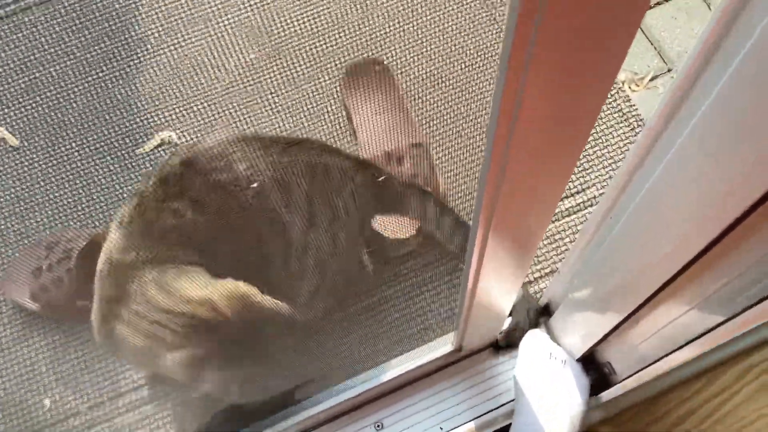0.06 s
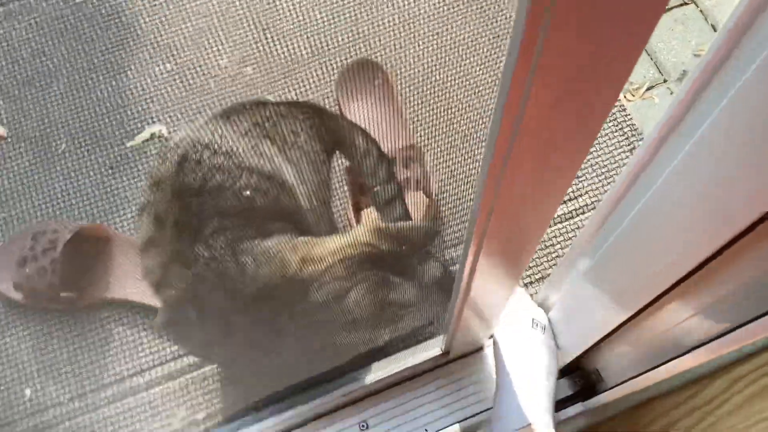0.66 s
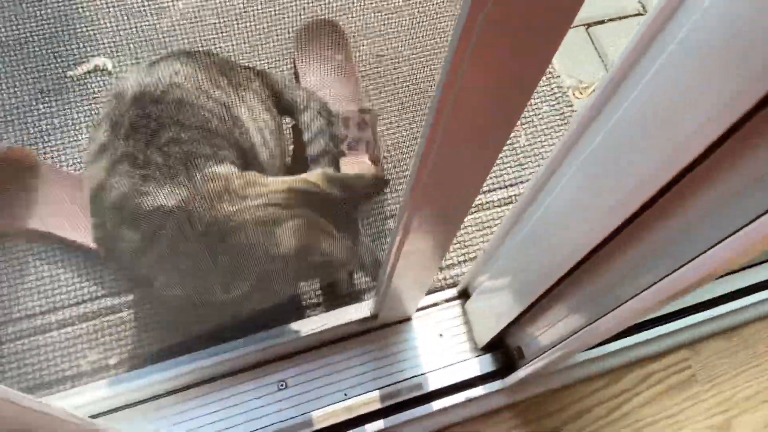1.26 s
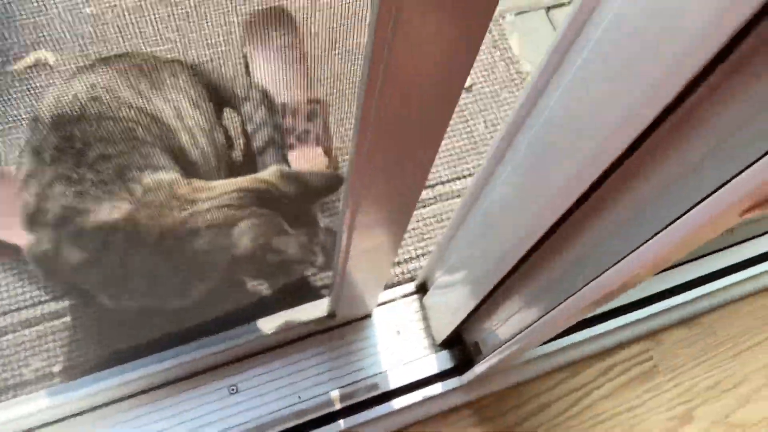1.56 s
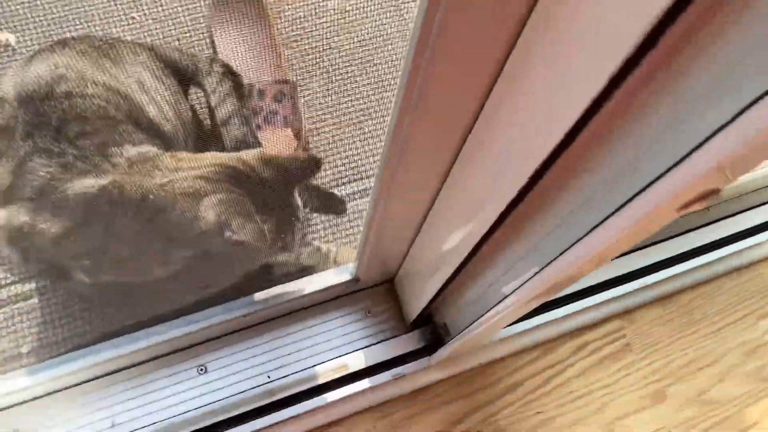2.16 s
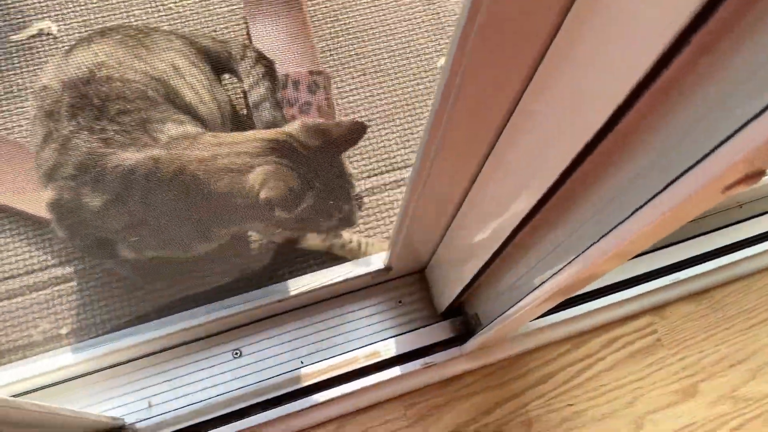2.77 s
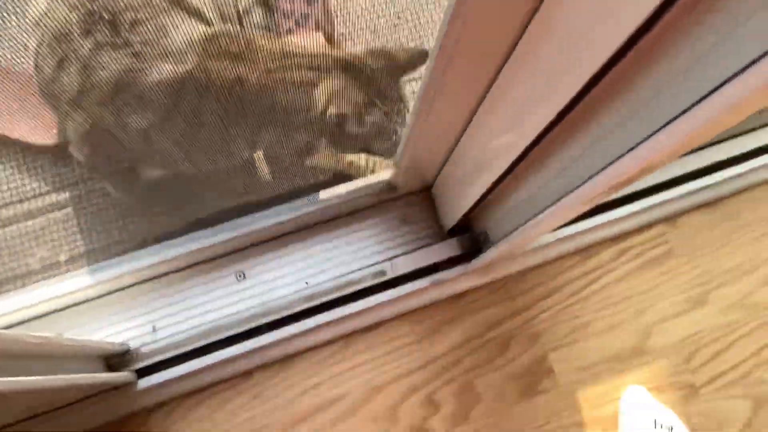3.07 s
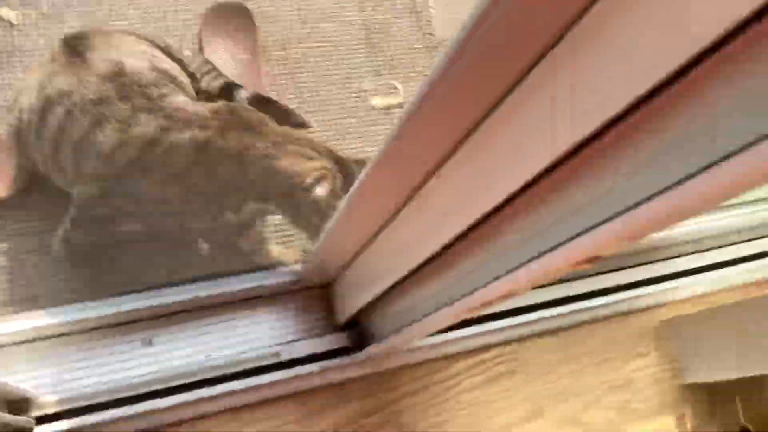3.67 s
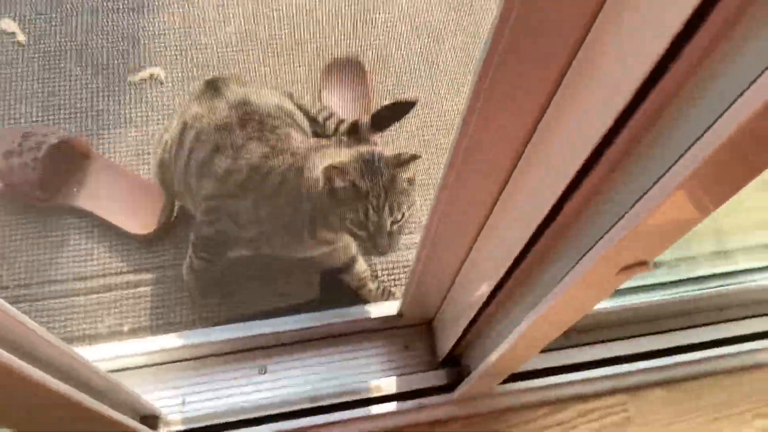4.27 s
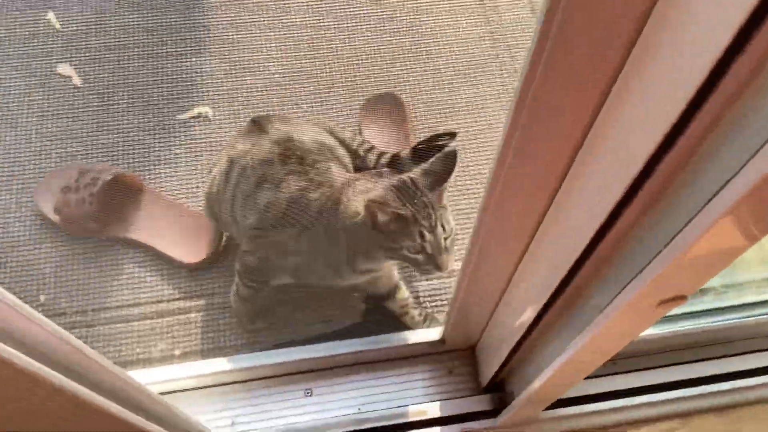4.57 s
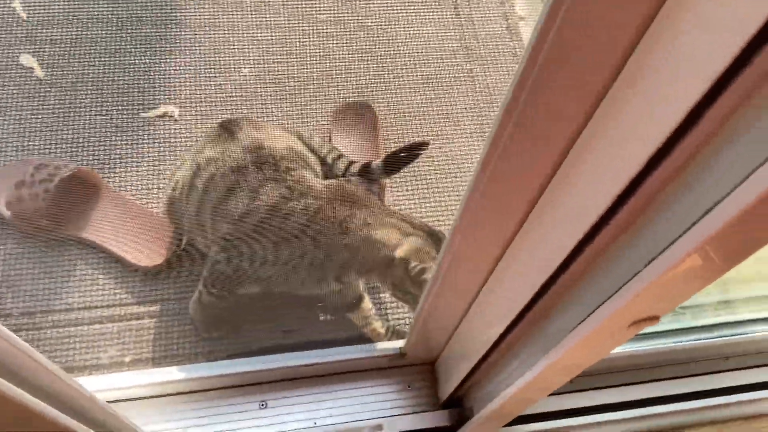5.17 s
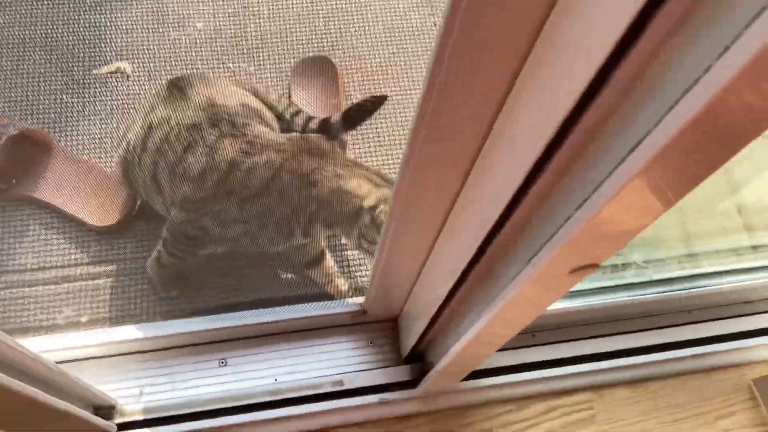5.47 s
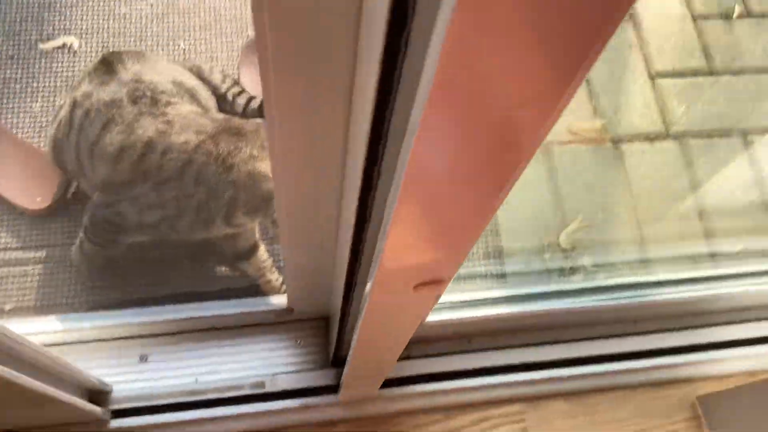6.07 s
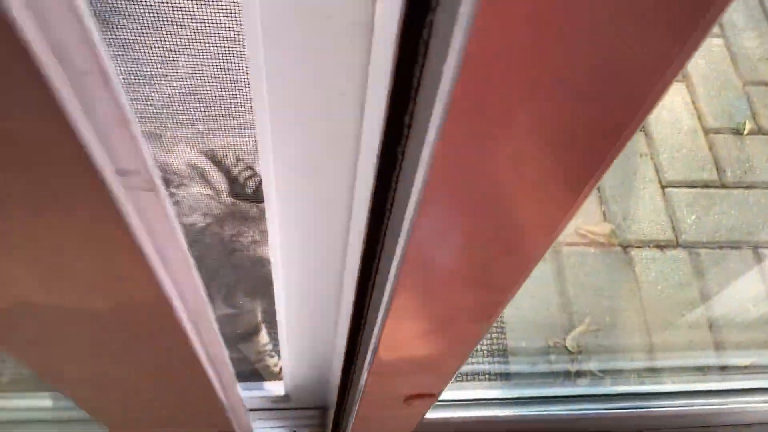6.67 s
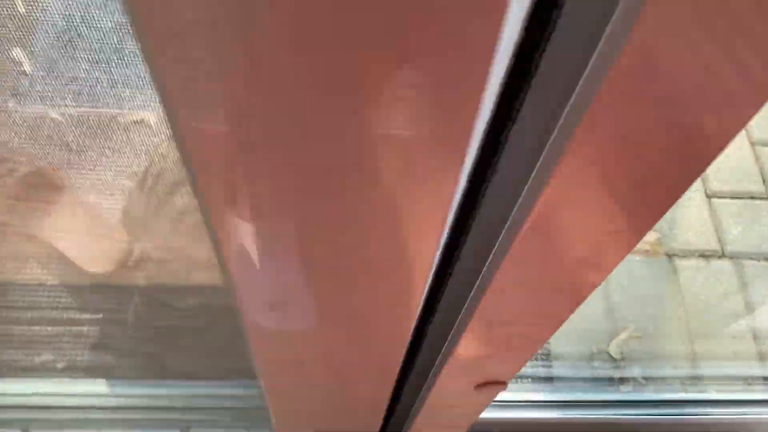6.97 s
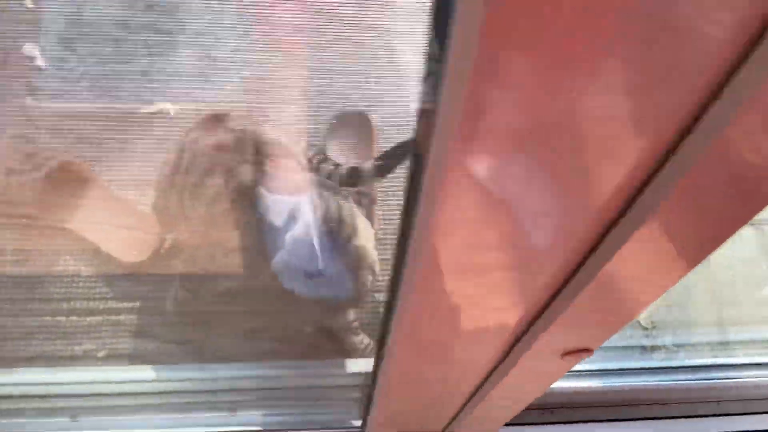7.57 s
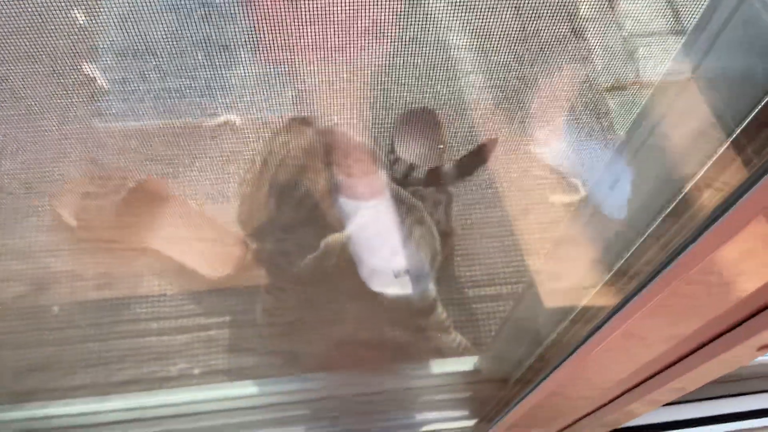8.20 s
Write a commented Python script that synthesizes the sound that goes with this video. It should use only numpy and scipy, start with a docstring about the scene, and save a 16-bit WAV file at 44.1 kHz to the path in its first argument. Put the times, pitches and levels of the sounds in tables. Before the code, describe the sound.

A sliding patio door knocks and rattles under someone's hand, then rolls softly along its track and shuts with a ringing thud.

```python
"""Two bangs of a sliding patio door in its frame, then close knocks, rattles and scuffs of handling and
door. The leaf rolls along its track with a soft brushing hiss and shuts with a ringing thud; the
latch clicks. Soft footfalls and rustling go on in between. Knocks are chattering impulses through
resonant bands, rubbing and rolling are grainy noise, and the leaf, its metal frame and a loose fitting
ring in decaying modes."""
import sys
import numpy as np
from scipy import signal
from scipy.fft import rfft, irfft, next_fast_len
from scipy.io import wavfile
from scipy.ndimage import map_coordinates

SR = 44100
rng = np.random.default_rng(int(sys.argv[2]) if len(sys.argv) > 2 else 0)


def bounce(signal):
    """Save signal as a 16-bit WAV file at the path given by the first command-line argument."""
    frames = np.transpose(np.atleast_2d(signal))
    limited = np.clip(frames, -1, 1)
    pcm = np.round(limited * 32767).astype(np.int16)
    wavfile.write(sys.argv[1], SR, pcm)


N = 372204
ROLL_START_S, SHUT_S = 5.72, 7.15
KNOCK_TOP_HZ = 10660  # upper edge of a knock's bright tick

# close knocks of handling and door: t/s, clack/dB, clack/Hz, thud/dB, thud/Hz, crack/dB, chatter/ms
KNOCKS = [(0.9042, -40.5, 1140, -50, 330, -53, 13), (0.9533, -37, 1190, -32, 228, -59, 4.1),
          (1.042, -23, 1430, -43, 168, -48, 11), (1.0765, -25.5, 1800, -42, 403, -44, 1.6),
          (1.3503, -48, 1920, -53, 415, -30, 6.5), (1.481, -43, 1410, -51, 214, -41, 9.6),
          (1.539, -59, 850, -40, 507, -56, 4.3), (1.6968, -45, 950, -49, 250, -81, 4.7),
          (1.9453, -13.5, 1580, -36, 212, -25, 0.8), (1.9769, -39, 1950, -54, 160, -29, 1.7),
          (1.9815, -23, 1710, -30, 256, -23, 2.2), (3.2297, -34.5, 1500, -31, 302, -41, 4),
          (3.2405, -27.5, 1600, -18, 316, -42, 4), (3.246, -22, 1840, -14.5, 258, -31, 1.8),
          (3.268, -33, 1520, -27, 383, -44, 5.5), (3.434, -42, 1330, -37, 380, -47.5, 12),
          (3.51, -29.5, 1530, -25, 229, -38, 2), (3.5445, -35, 1760, -44, 231, -26.5, 1.9),
          (3.5548, -26, 1920, -46, 340, -29, 1.2), (3.5882, -15, 2000, -29, 219, -25, 1.3),
          (3.612, -35, 1150, -31.5, 374, -31, 6), (3.648, -50, 1950, -33.5, 340, -29.5, 3.1),
          (3.7752, -31, 2250, -25, 694, -25.5, 2.5), (3.7825, -32, 2100, -36.5, 600, -29, 2.5),
          (3.8064, -21, 1810, -32, 500, -23.5, 1.4), (3.814, -25, 1830, -46, 525, -27.5, 0.6),
          (3.839, -45, 1900, -30, 154, -41, 1.6), (3.8486, -35, 2120, -32.5, 345, -37.5, 1.2),
          (3.885, -39.5, 1446, -52, 460, -54, 0.35), (3.923, -40, 2030, -33, 433, -32, 4.8),
          (3.9799, -54, 1950, -39, 523, -42, 1.1), (3.9896, -46, 1950, -37.5, 454, -45, 3.8),
          (4.2, -44.5, 1710, -51, 370, -50.5, 3.7), (4.247, -42, 1540, -53, 402, -46, 1.4),
          (4.4001, -27.5, 1620, -31.5, 310, -45, 1.3), (4.6897, -41.5, 1850, -45.5, 333, -44.5, 0.47),
          (4.7228, -34, 1700, -28.5, 330, -46, 3), (4.7382, -33, 1600, -31.5, 370, -48, 2.3),
          (4.743, -25.5, 1540, -27.5, 353, -38.5, 0.47), (5.872, -49.5, 1760, -57.5, 561, -56, 1.9),
          (6.049, -51, 1900, -61, 503, -56, 3.1), (6.449, -44, 1870, -64, 500, -55, 2.9),
          (6.755, -48, 1390, -47.5, 570, -56, 4.4), (7.1503, -34.5, 1460, -31.5, 630, -32.5, 1.2),
          (7.9812, -46.5, 2110, -41, 360, -63, 9), (8.052, -46, 1750, -46, 368, -61, 1.5),
          (8.104, -57.5, 1890, -55, 454, -60, 2.4), (8.1155, -41, 1780, -44.5, 378, -58, 0.61)]
# modes of the leaf and its metal frame: f/Hz, level/dB, t60/s
DOOR_MODES = [(77, -16.5, 0.3), (115, -15, .32), (149, -16, .32), (234, -10.5, .32), (330, -16, 0.69),
              (509, 2, 0.22), (620, -8.5, 0.09), (830, 4.5, 0.1), (891, 19, 0.031), (3570, -17.5, .36),
              (4900, -12.5, .2), (5130, -8, 0.12), (5580, -19, 0.44), (5830, -15.5, .3), (7500, -11, .33),
              (8166, -19, .28), (8823, -10, .2), (9300, -12.5, 0.29), (9749, -12.5, 0.45),
              (10200, -14, .28), (11100, -20, .36), (11400, -19, .26)]
# EQ curve of the shuddering door: f/Hz, level/dB
SHUDDER_EQ = [(24, -39.5), (40, -7), (145, 0), (177, -12.5), (222, -7), (550, -17), (2140, -19),
              (2830, -29.5), (3550, -20.5), (4560, -23.5), (5310, -19), (6830, -26.5), (9970, -20.5),
              (15300, -37.5), (16500, -46.5)]
# the four registers low, mid, high, top: from/Hz, to/Hz
BANDS = [(45, 650), (650, 2700), (2700, 7000), (7000, 15000)]


def from_db(db):
    """Decibels to gain."""
    return 10 ** (np.asarray(db) / 20)


def rms_one(x):
    """Scale to rms 1."""
    return x / np.sqrt(np.mean(x ** 2) + 1e-20)


def add(out, s, sound):
    """Mix a sound in at time s."""
    at = max(round(s * SR), 0)
    out[at:at + len(sound)] += sound[:max(N - at, 0)]


def gate(start_s, end_s, ramp_s=0.012):
    """1 during a spell, with short ramps at both ends."""
    t = np.arange(N) / SR
    return np.clip(np.minimum(t - start_s, end_s - t) / ramp_s + .5, 0, 1)


def drift(turns_per_s):
    """A random control curve of rms 1."""
    turns = rng.standard_normal(N // 16)
    return rms_one(np.interp(np.arange(N) / SR * turns_per_s, np.arange(len(turns)), turns))


def grainy_noise(grain_db, grains_per_s):
    """White noise roughened by a fast flicker in level."""
    return rng.standard_normal(N) * from_db(grain_db * drift(grains_per_s))


def band(x, low_hz, high_hz, order=2):
    """Butterworth band-pass."""
    sos = signal.butter(order, [low_hz, min(high_hz, .45 * SR)], "band", fs=SR, output="sos")
    return signal.sosfilt(sos, x + 1e-18)


def resonate(x, hz, width_hz, db):
    """Boost or cut one resonant band."""
    r = np.exp(-np.pi * width_hz / SR)
    poles = [1, -2 * r * np.cos(2 * np.pi * hz / SR), r * r]
    peak = signal.lfilter(np.array([1, 0, -1]) * (1 - r * r) / 2, poles, x)
    return x + (from_db(db) - 1) * peak


def resonances(x, table):
    """A chain of resonant boosts and cuts."""
    for hz, width_hz, db in table:
        x = resonate(x, hz, width_hz, db)
    return x


def registers(source, eq):
    """EQ a source and split it into the four registers, each of rms 1."""
    hz, db = np.transpose(eq)
    size = next_fast_len(N, real=True)
    gain = from_db(np.interp(np.log(np.fft.rfftfreq(size, 1 / SR) + 1), np.log(hz), db))
    coloured = irfft(rfft(source, size) * gain)[:N]
    return np.array([rms_one(band(coloured, low, high, order=4)) for low, high in BANDS])


def contact_colour(x):
    """The resonances shared by struck and rubbed parts."""
    # peaks and dips: f/Hz, width/Hz, gain/dB
    peaks = [(2100, 31, 0.5), (2780, 430, -2), (5720, 1300, 4.5), (10200, 990, -1.5)]
    return resonances(x, peaks)


def metal_tone(x, width_hz, lift_db):
    """Rubbing and chatter keep the high modes of the metal frame sounding."""
    return resonances(x, [(hz, width_hz, lift_db) for hz, _, _ in DOOR_MODES if hz > BANDS[2][0]])


def cupped_colour(x, spell_s=(3.6, 4.72)):
    """Hollow, cupped resonances colour the close handling sounds for a spell."""
    # peaks and dips: f/Hz, width/Hz, gain/dB
    peaks = [(90, 89, -7), (926, 46, 2.5), (1070, 280, 4), (1450, 140, -4), (1660, 100, 2), (2550, 140, 1),
             (2860, 88, 6), (3250, 350, -2.5), (3870, 83, 1), (5100, 120, 2.5), (7800, 900, -5.5),
             (14000, 7600, -7)]
    inside = x * gate(*spell_s) + 1e-18
    return x - inside + resonances(inside, peaks)


def bass_lag(x, corner_hz=110, stages=9):
    """All-pass stages hold the bass behind the treble, so every knock sweeps down in pitch."""
    r = np.exp(-2 * np.pi * corner_hz / SR)
    return signal.sosfilt(np.tile([-r, 1, 0, 1, -r, 0], (stages, 1)), x + 1e-18)


def reflections(x, t60=0.16, level_db=-20, predelay_s=0.003):
    """Faint early reflections off glass, frame and floor."""
    t = np.arange(SR // 2) / SR
    echoes = band(rng.standard_normal(len(t)), 500, 7000, order=1)
    echoes = echoes * from_db(-60 * t / t60) * (t > predelay_s)
    return from_db(level_db) * signal.fftconvolve(x, echoes / np.linalg.norm(echoes))[:N]


def near_surfaces(x, wander_ms=0.28, turns_per_s=4):
    """The microphone sways near hard surfaces, whose echoes make a shifting comb filter."""
    # paths by way of glass and frame: delay/ms, gain
    paths = [(1.3, 0.24), (2.9, 0.24), (4.7, 0.18)]
    out = x
    for delay_ms, gain in paths:
        lag = (delay_ms + wander_ms * drift(turns_per_s)) * SR / 1000
        out = out + gain * map_coordinates(x, [np.arange(N) - lag], order=3)
    return out / np.sqrt(1 + sum(gain ** 2 for _, gain in paths))


def effort(rest_db=-67):
    """Strength of the handling, zero at rest."""
    # rubbing of the handling: t/s, level/dB
    handling = [(0.0, -63.5), (0.87, -56), (1.04, -42), (1.18, -55), (1.72, -53), (2.01, -47.5), (2.2, -57),
                (2.6, -82.5), (3.27, -51.5), (3.42, -45), (3.55, -41.5), (3.7, -48.5), (3.79, -48),
                (3.96, -47.5), (4.24, -49), (4.59, -58), (4.83, -60.5), (5.6, -72.5)]
    level_db = np.interp(np.arange(N) / SR, *np.transpose(handling))
    return np.maximum(from_db(level_db) - from_db(rest_db), 0)


def air_and_motion(fastest_s=6.35, hush_s=0.6, waver_db=0.44):
    """The bed: outdoor air that the shut door muffles, rubbing hands, roller rumble, brush-seal hiss."""
    # EQ curve of the bed: f/Hz, level/dB
    bed_eq = [(21, -53), (35, -21.5), (76, 12), (121, 8.5), (275, 6.5), (551, -4), (611, -15), (790, -13.5),
              (1320, -13), (1580, -15), (2790, -26.5), (6360, -22.5), (10400, 3), (15300, -13),
              (16500, -46)]
    # its mix by register: air/dB, change once shut/dB, handling/dB, rolling/dB, exponent of speed
    mix = [(-64, 3, -3.5, -55, 0.97), (-67.5, -11, -6, -56, 0.99), (-75.5, -1, -9, -56, 0.59),
           (-71.5, -3.5, -14.5, -52, 0.67)]
    # resonances of the track: f/Hz, width/Hz, gain/dB
    track = [(273, 750, 5.5), (446, 40, 1.5), (630, 40, 5), (1150, 81, 4), (1270, 51, 0.5), (2620, 600, -3),
             (3900, 1100, 4)]
    t = np.arange(N) / SR
    speed = np.interp(t, [ROLL_START_S, fastest_s, SHUT_S], [0.32, 1, 0.41])  # share of top speed
    rolls, handled = gate(ROLL_START_S, SHUT_S), effort()
    shut = np.clip((t - SHUT_S) / hush_s, 0, 1)
    grains = registers(grainy_noise(grain_db=1.5, grains_per_s=500), bed_eq)
    still = rolling = 0
    for noise, (air_db, shut_db, handling_db, roll_db, power) in zip(grains, mix):
        noise = noise * from_db(waver_db * drift(35))
        air, hands = from_db(air_db + shut_db * shut), from_db(handling_db) * handled
        still = still + noise * (1 - rolls) * np.hypot(air, hands)
        rolling = rolling + noise * rolls * from_db(roll_db) * speed ** power
    return still + resonances(rolling, track)


def grit(per_s=24, level_db=-29, spread_db=4):
    """Specks in the track tick dully under the rollers."""
    specks = (rng.random(N) < per_s / SR) * gate(ROLL_START_S, SHUT_S)
    sizes = from_db(level_db + spread_db * np.clip(rng.standard_normal(N), -2, 2))
    return contact_colour(band(specks * sizes, 400, 2800))


def loose_parts(per_s=22, over_effort_db=24, spread_db=3):
    """Loose fittings tick at random, louder with stronger handling."""
    sizes = from_db(over_effort_db + spread_db * np.clip(rng.standard_normal(N), -2, 2)) * effort()
    ticks = rng.random(N) < per_s / SR
    return contact_colour(band(sizes * ticks, 300, 5000))


def wobbles(length_s=0.0339, sag=0.24):
    """Rollers and swaying leaf give round, dull bumps: a few cycles of sine that sag in pitch."""
    # bumps: crest/s, level/dB, f/Hz
    bumps = [(4.236, -43.5, 243), (4.359, -47, 250.5), (5.918, -44.5, 265), (6.061, -43, 278),
             (6.196, -43, 234), (6.225, -44.5, 278), (6.25, -46.5, 290), (6.837, -52, 302),
             (7.606, -44.5, 293)]
    out, along = np.zeros(N), np.linspace(-.5, .5, int(length_s * SR))
    swell = np.sqrt(2) * np.cos(np.pi * along) ** 2
    for crest, db, hz in bumps:
        phase = 2 * np.pi * (np.cumsum(hz * (1 - sag * along)) / SR + rng.random())
        add(out, crest - length_s / 2, from_db(db) * swell * np.sin(phase))
    return out


def muffled_rubs(curve=0.48, band_hz=(720, 1900)):
    """Soft shuffling with no treble swells and trails off."""
    # shuffles: start/s, crest/s, end/s, level/dB
    rubs = [(3.6, 3.607, 3.73, -39), (3.665, 3.736, 3.79, -47), (7.56, 7.615, 7.79, -57.5),
            (7.946, 7.97, 7.8, -52)]
    grains = grainy_noise(grain_db=3, grains_per_s=160)
    t = np.arange(N) / SR
    level = sum(from_db(db) * np.interp(t, times, [0, 1, 0]) ** curve for *times, db in rubs)
    return level * rms_one(band(grains, *band_hz, order=8))


def friction(eq, grain_db, grains_per_s, lowest_hz):
    """Dense catches and slips with a metallic tinge, in four registers."""
    grains = metal_tone(contact_colour(grainy_noise(grain_db, grains_per_s)), width_hz=48, lift_db=4)
    return registers(band(grains, lowest_hz, SR / 2), eq)


def rustles(release_s=0.077, fade_db=7.5, uneven_db=3, hiss_share=0.34, ring_q=14, ring_db=9):
    """Soft strokes of hand and cloth fade unevenly and lift off; the rubbed part rings."""
    # strokes: start/s, end/s, attack/ms, rub/dB, hiss/dB, ring/Hz
    strokes = [(0.102, 0.36, 38, -66, -68, 3800), (0.327, 0.556, 230, -54, -50, 7500),
               (0.562, 0.818, 15, -73, -59.5, 10600), (1.099, 1.254, 34, -49, -50, 1910),
               (1.297, 1.47, 23, -53.5, -53, 5300), (1.399, 1.629, 71, -48, -50, 760),
               (1.696, 2.032, 83, -52, -47, 5400), (2.296, 2.567, 140, -59, -55.5, 1770),
               (2.885, 2.998, 12, -56.5, -55.5, 2040), (3.088, 3.26, 240, -72.5, -54.5, 10100),
               (3.32, 3.526, 140, -45, -51, 5400), (4.064, 4.212, 25, -49, -55, 5100),
               (4.471, 4.635, 15, -56, -56.5, 2850), (4.589, 4.724, 6.1, -47, -45.5, 5000),
               (4.852, 5.145, 61, -94, -69.5, 10900), (6.961, 7.15, 88, -66, -49, 10000),
               (7.419, 7.616, 12, -64, -55, 10600), (7.552, 7.71, 43, -60, -75, 315),
               (7.949, 8.142, 7.5, -58.5, -59.5, 2020), (8.11, 8.393, 16, -67.5, -66.5, 5180),
               (8.32, 8.484, 45, -54.5, -57.5, 3100)]
    # EQ curve of light rubbing: f/Hz, level/dB
    rustle_eq = [(29, -43), (90, -6.5), (330, -6.5), (640, -15), (900, -7), (1300, -6), (2100, -8.5),
                 (3200, -12.5), (4300, -8.5), (5400, -13), (6900, -15), (10200, -6.5), (12000, -12.5),
                 (15000, -24), (16500, -51)]
    out = np.zeros(N)
    grains = friction(rustle_eq, grain_db=2, grains_per_s=870, lowest_hz=120)
    grains *= from_db(uneven_db * drift(45))
    for s, end_s, attack_ms, rub, hiss, hz in strokes:
        piece, length = grains[:, int(s * SR):int(end_s * SR)], end_s - s
        t = np.arange(piece.shape[1]) / SR
        ramps = np.clip(np.minimum(t * 1000 / attack_ms, (length - t) / release_s), 0, 1)
        envelope = ramps * from_db(-fade_db * t / length)
        gains = from_db([rub - 5, rub, rub + hiss_share * (hiss - rub) - 4, hiss])  # low to top
        add(out, s, resonate(envelope * (gains @ piece), hz, hz / ring_q, ring_db))
    return out


def swishes(taper=0.79, rough_db=1.5, catches_per_s=220):
    """Fine, uneven friction sings or rasps in a narrow band that glides along the stroke."""
    # strokes: start/s, end/s, from/Hz, to/Hz, width/Hz, level/dB
    strokes = [(1.013, 1.077, 3500, 3400, 100, -45), (1.056, 1.083, 6500, 11400, 340, -24),
               (3.61, 3.68, 800, 760, 46, -32.5), (3.607, 3.635, 3900, 4770, 1000, -26.5),
               (3.628, 3.678, 2600, 2520, 240, -35), (3.713, 3.77, 660, 690, 70, -43.5),
               (4.31, 4.484, 7160, 6330, 260, -58), (4.366, 4.48, 5700, 5450, 320, -57),
               (4.585, 4.673, 2970, 2880, 70, -48.5), (4.724, 4.767, 2650, 2600, 180, -41),
               (5.753, 5.805, 9300, 11500, 260, -51), (7.581, 7.78, 2435, 2420, 9.8, -70),
               (7.574, 7.678, 315, 325, 14, -52.5), (7.581, 7.715, 940, 920, 25, -61.5)]
    out = np.zeros(N)
    white = rng.standard_normal(N) + 1j * rng.standard_normal(N)
    catches = from_db(rough_db * drift(catches_per_s))
    for s, end_s, from_hz, to_hz, width_hz, db in strokes:
        grains = signal.sosfilt(signal.butter(2, width_hz, fs=SR, output="sos"), white) * catches
        piece = grains[int(s * SR):int(end_s * SR)]
        along = np.linspace(0, 1, len(piece))
        phase = 2 * np.pi * np.cumsum(from_hz + (to_hz - from_hz) * along) / SR
        singing = rms_one(np.real(piece * np.exp(1j * phase)))  # low noise shifted up to the glide
        add(out, s, from_db(db) * np.abs(np.sin(np.pi * along)) ** taper * singing)
    return out


def scrapes(swell=1.21, let_go_s=0.014, top_lean=0.29):
    """Hard friction swells to a crest and lets go; the sharper the scrape, the more top it has."""
    # scrapes: crest/s, rise/ms, mid/dB, bass/dB, treble/dB
    strokes = [(1.025, 69, -31, -27.5, -43), (1.054, 33, -27, -44, -65), (1.076, 51, -46.5, -36, -26.5),
               (3.575, 135, -40, -34, -46.5), (3.272, 28, -31.5, -22, -41.5),
               (3.629, 17, -28, -27.5, -33.5), (3.657, 22, -27, -32.5, -31.5), (3.709, 14, -32.5, -34, -44),
               (3.77, 67, -38, -56.5, -41.5), (3.8, 3.4, -28.5, -30.5, -19), (3.993, 76, -38, -42, -66),
               (4.754, 81, -38.5, -35.5, -47)]
    # EQ curve of hard scuffing: f/Hz, level/dB
    scuff_eq = [(29, -44.5), (50, -1), (332, -9.5), (639, -15.5), (814, -10.5), (1260, -4.5), (1390, -4.5),
                (2490, -9), (3170, -12.5), (5270, -12.5), (6560, -15.5), (9680, 0), (13900, -11.5),
                (15300, -51), (16500, -65)]
    levels = np.zeros((len(BANDS), N))
    for crest, rise_ms, mid, bass, treble in strokes:
        rise_s = rise_ms / 1000
        t = np.arange(0, rise_s + let_go_s, 1 / SR)
        envelope = np.interp(t, [0, rise_s, rise_s + let_go_s], [0, 1, 0]) ** swell
        lean = top_lean * (treble - mid)
        for register, gain in zip(levels, from_db([bass, mid, treble - 2 - lean, treble + 1 + lean])):
            add(register, crest - rise_s, gain * envelope)
    return np.sum(levels * friction(scuff_eq, grain_db=3.5, grains_per_s=900, lowest_hz=150), axis=0)


def knock_halos(in_s=0.011, out_s=0.014, clack_db=-16, crack_db=-11):
    """A short, soft noise halo swells into each knock and fades after it."""
    envelope = np.interp(np.arange(-in_s, out_s, 1 / SR), [-in_s, 0, out_s], [0, 1, 0])
    mid, treble = np.zeros((2, N))
    for s, clack, _, _, _, crack, _ in KNOCKS:
        add(mid, s - in_s, from_db(clack + clack_db) * envelope)
        add(treble, s - in_s, from_db(crack + crack_db) * envelope)
    noise = contact_colour(rng.standard_normal(N))
    body, hiss = band(noise, *BANDS[1]), band(noise, BANDS[2][0], KNOCK_TOP_HZ)
    return mid * rms_one(body) + treble * rms_one(hiss)


def contact(t, chatter_ms, looseness, build=0.043):
    """One sharp touch, then a chatter of tiny re-contacts that builds quickly and dies."""
    age = t * 1000 / chatter_ms
    chatter = rng.standard_normal(len(t)) * np.exp(-age) * (1 - np.exp(-age / build))
    force = looseness * chatter / np.linalg.norm(chatter)
    force[0] += 1
    return force


def hit_level(x, db):
    """Give a transient the energy of 10 ms at this rms level."""
    return from_db(db) * x / np.linalg.norm(x) * np.sqrt(SR / 100)


def blows(latch_s=7.4331, light_chatter_ms=2.8, bump_hz=298):
    """The cue list of knocks, bumps, clicks and the latch."""
    # soft thumps and footfalls: t/s, level/dB, f/Hz
    bumps = [(0.277, -54, 194), (0.392, -51.5, 218), (0.853, -43, 344), (0.9449, -30.5, 157),
             (2.446, -49.5, 255), (3.296, -27, 275), (3.31, -27.5, 163), (3.338, -33.5, 261),
             (3.388, -24.5, 219), (3.661, -30, 316), (3.686, -35.5, 298), (7.157, -31.5, 170),
             (7.7144, -42.5, 296), (7.755, -51.5, 343)]
    # light metal clicks of the fittings: t/s, tick/dB, body/dB
    clicks = [(0.4659, -43.5, -56), (1.52, -41, -45), (2.6932, -48.5, -53), (4.317, -62, -60.5),
              (4.346, -58, -53), (5.026, -55, -74), (5.406, -44, -56), (5.508, -52.5, -64.5),
              (5.5685, -38, -62), (5.589, -41, -64), (5.5954, -39, -56), (5.6175, -38.5, -56.5),
              (5.682, -49, -57), (5.6915, -37, -48.5), (5.701, -46, -55), (5.73, -47, -58),
              (5.735, -47, -55), (6.413, -39.5, -50.5), (6.863, -43.5, -70)]
    # each cue: t/s, thud/dB, thud/Hz, clack/dB, clack/Hz, crack/dB, tick/dB, tick top/Hz, chatter/ms
    for s, clack, clack_hz, thud, thud_hz, crack, chatter_ms in KNOCKS:
        tick = crack + max(1.32 * (crack + 29.5), -0.5)  # a harder knock cracks brighter
        yield s, thud, thud_hz, clack, clack_hz, crack, tick, KNOCK_TOP_HZ, chatter_ms
    for s, db, hz in bumps:
        clack = db - 9.5 + 23 * np.log2(hz / bump_hz)  # a higher bump clacks more
        yield s, db, hz, clack, 1150, db - 30, db - 30, KNOCK_TOP_HZ, light_chatter_ms
    latch = (latch_s, -22.5, -37.5, 2.5)
    for s, tick, body, chatter_ms in [(*click, light_chatter_ms) for click in clicks] + [latch]:
        yield s, body - 15.5, bump_hz, body - 3.5, 1630, body, tick, 11940, chatter_ms


def pane_boom(band_hz=(60, 129), t60=0.15, db_per_octave=-12):
    """The glass booms after every thud, most after the deep ones."""
    power, t = np.zeros(N), np.arange(SR // 2) / SR
    for s, thud, thud_hz, *_ in blows():
        db = thud - 10.5 + db_per_octave * np.log2(thud_hz / 240)
        add(power, s, from_db(db - 60 * t / t60) ** 2)
    return np.sqrt(power) * rms_one(band(rng.standard_normal(N), *band_hz))


def jamb_buzz(crest_s=0.055):
    """The shut leaf chatters against the jamb: a short swell, then a dying metallic rattle."""
    # the buzz by register: crest/dB, t60/s
    decays = [(-45.5, 0.99), (-49.5, 0.65), (-43, 0.53), (-36.5, 0.33)]
    t = np.maximum(np.arange(N) / SR - SHUT_S, 0)
    swell, dying = np.minimum(t / crest_s, 1), np.maximum(t - crest_s, 0)
    chatter = grainy_noise(grain_db=2, grains_per_s=300)
    grains = registers(metal_tone(chatter, width_hz=20, lift_db=12.5), SHUDDER_EQ)
    return swell * sum(noise * from_db(db - 60 * dying / t60) for noise, (db, t60) in zip(grains, decays))


def jingles(chatter_ms=4, looseness=0.78):
    """A loose metal fitting rings at each touch, its pitch shifting with the way it is seated."""
    # touches: t/s, level/dB, pitch/Hz
    touches = [(1.981, -23, 2120), (3.59, -30, 2016), (3.625, -28.5, 2310), (3.652, -31, 2490),
               (3.664, -37, 2384), (3.748, -38, 2440), (3.7755, -23, 2446), (3.8066, -20.5, 1916),
               (3.826, -53, 2290), (3.849, -34.5, 2180), (3.868, -56, 2130), (3.926, -32, 2077),
               (3.958, -36.5, 2010), (3.979, -33, 2090), (3.99, -31, 2016)]
    # modes of the fitting: ratio to the pitch, level/dB, t60/s
    modes = [(.92, -7, .04), (1, -0.5, .055), (1.035, -5, .05), (1.12, -15.5, .035), (2.03, -10, .03),
             (2.53, -6.5, 0.03)]
    out, t = np.zeros(N), np.arange(SR // 8) / SR
    for s, db, hz in touches:
        ring = sum(from_db(mode_db - 60 * t / t60) * np.sin(2 * np.pi * hz * ratio * t)
                   for ratio, mode_db, t60 in modes)
        add(out, s, hit_level(signal.fftconvolve(contact(t, chatter_ms, looseness), ring), db))
    return out


def clangs():
    """The frame clangs on one pitch that builds while the parts press together and dies as they part."""
    # the hardest contacts: crest/s, level/dB, f/Hz, swell/ms, t60/ms
    contacts = [(1.0495, -20.5, 1375, 5.5, 40), (1.9464, -10.5, 1705, 1, 22), (1.983, -12, 2104, 4.1, 25),
                (4.402, -27, 1915, 2.3, 19)]
    out = np.zeros(N)
    for crest, db, hz, swell_ms, t60_ms in contacts:
        swell_s, t60 = swell_ms / 1000, t60_ms / 1000
        t = np.arange(-swell_s, t60, 1 / SR)
        envelope = np.minimum(1 + t / swell_s, 1) * from_db(db - 60 * np.maximum(t, 0) / t60)
        add(out, crest - swell_s, envelope * np.sin(2 * np.pi * hz * t))
    return out


def knocks(thud_span=1.56):
    """Each blow layers a dull thud, a hollow clack and a bright crack with a tick on top."""
    out, t = np.zeros(N), np.arange(SR // 8) / SR
    damping = np.cos(np.pi / 2 * t / t[-1]) ** 2
    for s, thud_db, thud_hz, clack_db, clack_hz, crack_db, tick_db, top_hz, chatter_ms in blows():
        thud = band(contact(t, chatter_ms=5, looseness=1), thud_hz / thud_span, thud_hz * thud_span)
        thud = hit_level(resonate(thud, thud_hz, width_hz=80, db=6), thud_db + 1)
        clack = band(contact(t, chatter_ms, looseness=1), 0.46 * clack_hz, 1.63 * clack_hz, order=3)
        clack = hit_level(resonate(clack, clack_hz, width_hz=330, db=11), clack_db - 1.5)
        chatter = contact(t, chatter_ms, looseness=8.2)
        crack = hit_level(band(chatter, 2700, 7000), crack_db - 2)
        tick = hit_level(band(chatter, 8200, top_hz), tick_db - 3)
        add(out, s, damping * (thud + clack + crack + tick))
    return contact_colour(out)


def slams(attack_s=0.0015, rattle_db=4, rattles_per_s=110, slip_rad=0.41):
    """A hard blow sets the door's modes ringing and rattling; a dense shudder dies away in the room."""
    # blows that shake the whole leaf: t/s, low/dB, mid/dB, high/dB, top/dB, modes/dB
    impacts = [(1.951, -31, -29, -31.5, -42, -70), (1.983, -72, -29.5, -30, -39, -56),
               (7.153, -30.5, -35, -40, -55, -32)]
    # their tails by register: door t60/s, room t60/s, room/dB
    tails = [(0.42, 0.56, -12), (0.15, 0.58, -12), (0.071, 0.57, -25.5), (0.19, .55, -19.5)]
    out, t = np.zeros(N), np.arange(SR) / SR
    shudder = registers(rng.standard_normal(N), SHUDDER_EQ)
    for s, *band_db, modes_db in impacts:
        at, sound = round(s * SR), np.zeros(SR)
        for noise, db, (door_t60, room_t60, room_db) in zip(shudder, band_db, tails):
            tail = from_db(-60 * t / door_t60) + from_db(room_db - 60 * t / room_t60)
            sound += from_db(db) * tail * noise[at:at + SR]
        for hz, db, t60 in DOOR_MODES:
            # loose parts shake each mode in strength and phase
            rattle, shake = (np.interp(t * rattles_per_s, np.arange(SR), row)
                             for row in rng.standard_normal((2, SR)))
            phase = 2 * np.pi * (hz * t + rng.random()) + slip_rad * shake
            sound += from_db(modes_db + db + rattle_db * rattle - 60 * t / t60) * np.sin(phase)
        add(out, s, sound * (1 - np.exp(-t / attack_s)))
    return out


def scene():
    """Close hits, the shaken door and the quiet movement around them, in mono."""
    hits = knocks() + jingles() + clangs()
    textures = scrapes() + knock_halos() + rustles() + muffled_rubs()
    movement = near_surfaces(textures + loose_parts() + grit() + air_and_motion())
    mix = hits + reflections(hits) + slams() + jamb_buzz() + movement
    return (cupped_colour(bass_lag(mix)) + swishes() + wobbles() + pane_boom())[None]


def record(dry, low_cut_hz=52, high_cut_hz=16400):
    """The microphone drops the deep bass and rounds the highest peaks; the top is cut."""
    rounded = np.tanh(band(dry, low_cut_hz, SR / 2, order=4))
    return signal.sosfilt(signal.ellip(10, .2, 80, high_cut_hz, fs=SR, output="sos"), rounded)


dry = scene()
out = record(dry)
bounce(out)
```